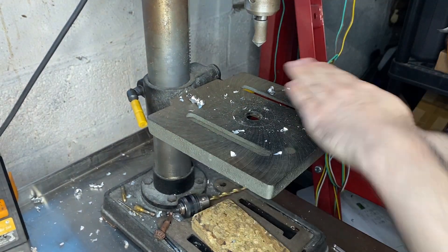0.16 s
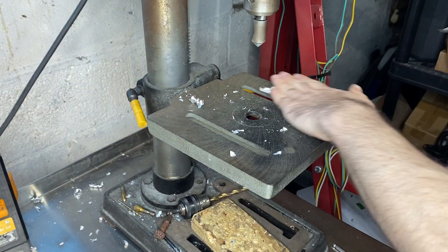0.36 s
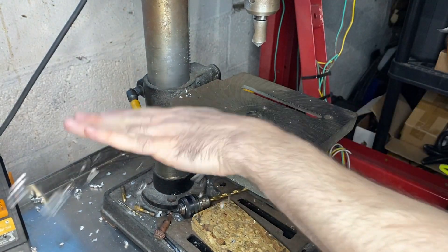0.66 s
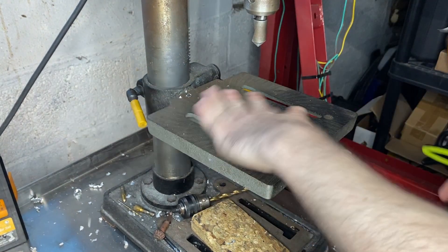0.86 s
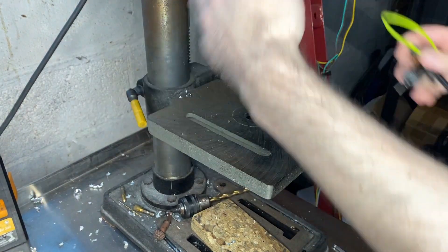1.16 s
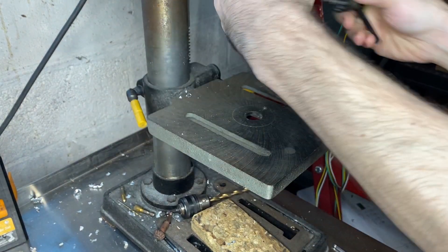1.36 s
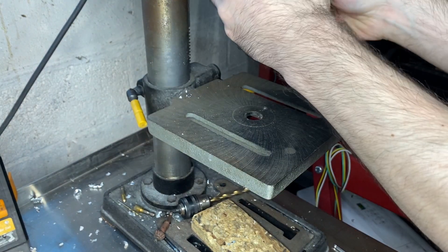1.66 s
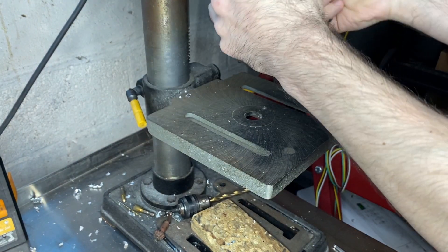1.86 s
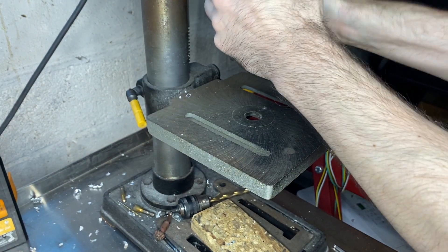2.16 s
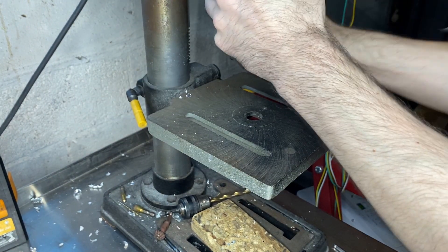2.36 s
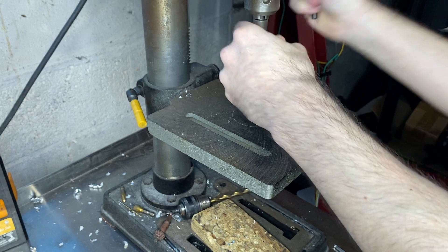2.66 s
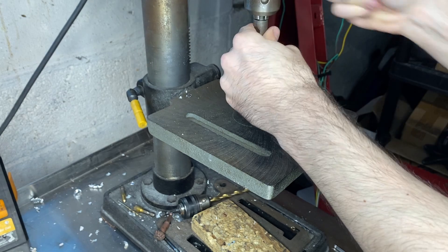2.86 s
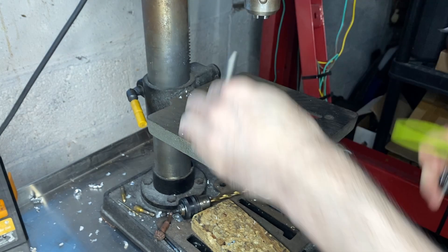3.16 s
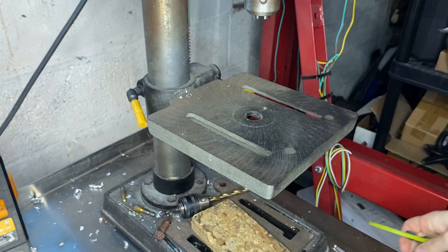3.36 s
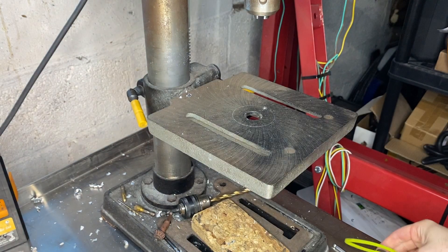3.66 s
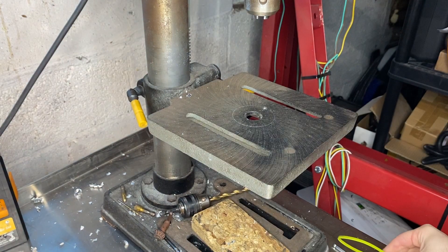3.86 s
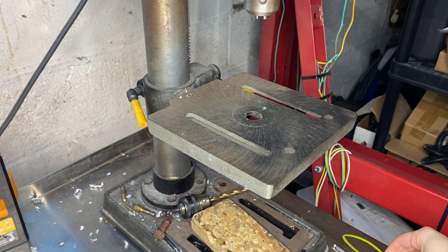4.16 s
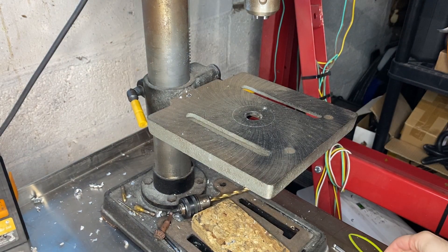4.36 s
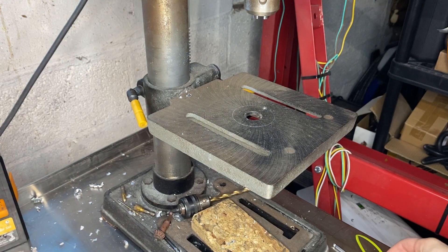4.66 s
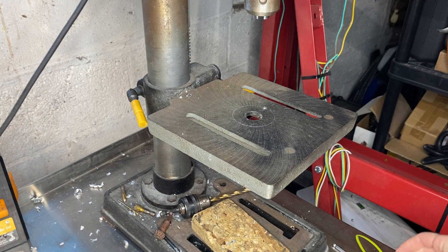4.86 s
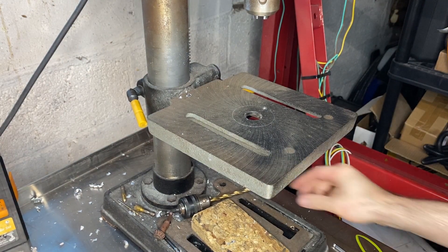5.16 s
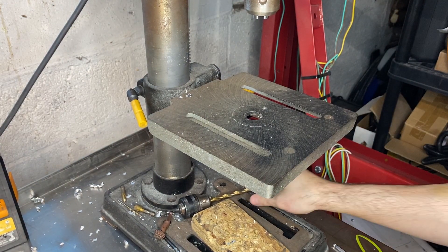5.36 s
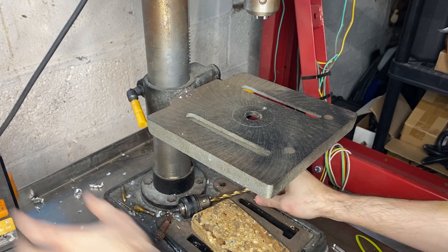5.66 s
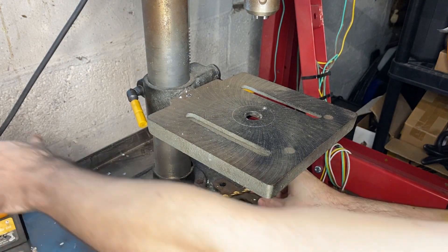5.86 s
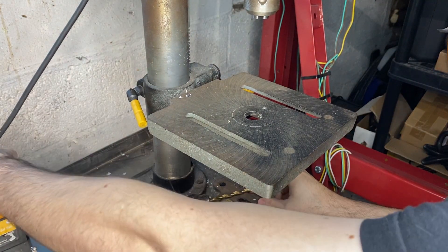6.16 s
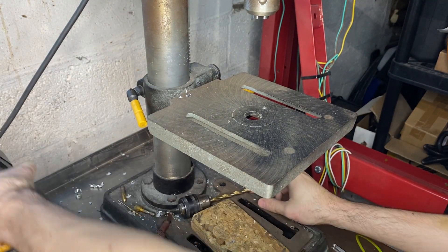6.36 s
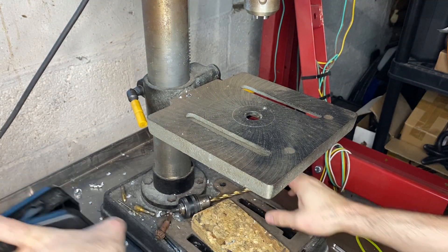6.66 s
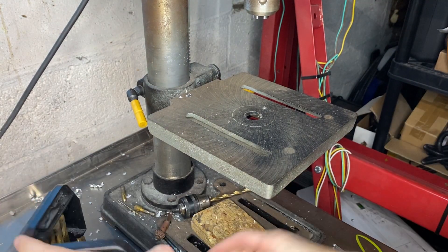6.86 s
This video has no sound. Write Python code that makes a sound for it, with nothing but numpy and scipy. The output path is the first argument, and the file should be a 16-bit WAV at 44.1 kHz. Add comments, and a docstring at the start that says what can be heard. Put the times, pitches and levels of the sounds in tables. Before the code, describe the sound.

A close stereo microphone in a small bare workshop, with a short hard room echo and very soft low background. From 0 to 1.2 seconds a hand sweeps metal chips off an iron table: light airy strokes, tiny bright ticks and tinkles, faint creaks and a soft thud near 0.9. Hard knocks of a key on a chuck come at about 1.3 and 1.7, then a dense, loudest cluster at 2.2 to 2.3 makes the cast machine head ring and boom. Small clicks follow, with a sharp bright clink near 2.9, then dry plinks and low bumps. Around 3.7 to 4.05 the bit and key clatter and bounce on the steel bench, and one rolls unevenly until about 4.7. It is almost silent until faint rubbing at 5.5. From 6.0 to 7.0 a box is dragged with scraping, abrupt cracks, jolts and dull thumps, strongest near 6.5.

```python
"""Drill press at close range

In a small bare workshop, two microphone ports sit close to a drill press. A hand sweeps chips off its iron
table, a key knocks the chuck open, the bit and key drop on the steel bench and a box is dragged over it.
Blows are noise cracks with clusters of dying modes, and friction is noise through a moving resonance.
Faint creaks, plinks and thuds, a soft low background and the room's answer lie behind.
"""
import sys
import numpy as np
from scipy import signal
from scipy.fft import rfft, irfft, next_fast_len
from scipy.io import wavfile
from scipy.ndimage import uniform_filter1d, map_coordinates

SR = 44100
rng = np.random.default_rng(int(sys.argv[2]) if len(sys.argv) > 2 else 0)


def generate_wav(signal):
    """Clip the signal to [-1, 1] and save it as 16-bit WAV at the path in sys.argv[1]."""
    frames = np.transpose(np.atleast_2d(signal))
    scaled = np.clip(frames, -1, 1) * 32767
    pcm = np.round(scaled).astype(np.int16)
    wavfile.write(sys.argv[1], SR, pcm)


N = 309141  # length in samples

# Pairs of channels are mid and side until scene() turns them into ports; table levels are source settings.
# key and jaws knocking the chuck: (t/s, sizzle peak level/dB, clank level/dB, body level/dB, t60/s,
# clink f/Hz, clink level/dB, boom level/dB, ring level/dB)
KNOCKS = [(1.333, -47.5, -56.5, -44.5, 0.26, 1593, -41, -40, -52),
          (1.6669, -35, -37.5, -39, 0.13, 3335, -33, -48.5, -42.5),
          (1.7261, -27, -51, -38, 0.096, 3420, -29.5, -36.5, -39),
          (1.7734, -46, -43.5, -37, 0.1, 1500, -43, -42, -41.5),
          (2.178, -49.5, -57.5, -51.5, 0.19, 1204, -48, -46.5, -55),
          (2.207, -40, -49, -38, 0.14, 2030, -38.5, -36.5, -41.5),
          (2.2263, -54.5, -56, -30.5, 0.12, 1430, -49, -34, -53.5),
          (2.291, -39.5, -42.5, -27.5, 0.18, 1800, -24.5, -27.5, -35.5),
          (2.2983, -26.5, -38.5, -23.5, 0.18, 1170, -25.5, -31, -27.5),
          (2.3146, -21.5, -28, -22, 0.16, 1507, -22.5, -28, -16.5),
          (2.8677, -35, -50, -47.5, 0.11, 1293, -40.5, -41.5, -44.5)]
# colour of the chuck: (f/Hz, level/dB per Hz)
CHUCK_COLOUR = [(150, -4.5), (500, 10), (1200, -5.5), (2500, -6), (5000, -19), (8000, -23), (12000, -27),
                (16500, -53.5)]


def chuck_knocks():
    """Hard blows whose treble dies much sooner than the body."""
    return clatter(KNOCKS, CHUCK_COLOUR, rise=0.00093, crack_db=1.5, treble_life=0.35, clink_life=0.62)


# lowest modes of the machine head: (f/Hz, level/dB, t60/s)
BOOM_MODES = [(215, 0, 0.5), (228, -8, 0.2), (205, -10, 0.2)]
# its higher modes: (f/Hz, level/dB, t60/s)
HEAD_MODES = [(291, -13, .12), (314, -11, .15), (371, -9, .35), (421, -9, .25), (453, -7, .25),
              (520, -3, .18), (577, -12, .15), (668, 1, .14), (700, 0, .18), (775, -15, .17),
              (862, -16, .2), (927, -16, .2), (1362, -22, .24), (4800, -35.5, 0.13)]


def machine_head():
    """Every knock sets the cast head ringing, its higher modes at new strengths; the boom builds up slowly."""
    out = np.zeros(N)
    for s, *_, boom_db, ring_db in KNOCKS:
        for hz, db, t60 in HEAD_MODES:
            strength = amp(ring_db + db + rng.normal(0, 2.3))
            add(out, s, strength * ring(hz, t60, rise=0.0075))
        for hz, db, t60 in BOOM_MODES:
            add(out, s + 0.0075, amp(boom_db + db) * ring(hz, t60, rise=.018))
    return out


# bit and key landing and bouncing on the bench: (t/s, sizzle peak level/dB, clank level/dB,
# body level/dB, t60/s, clink f/Hz, clink level/dB)
DROPS = [(3.6998, -21, -43, -33.5, 0.24, 725, -59), (3.7416, -18.5, -22.5, -24, 0.21, 1227, -31),
         (3.8797, -49, -40.5, -29, 0.17, 908, -32.5), (4.0013, -57, -52.5, -40, 0.35, 910, -42),
         (4.0239, -18, -27.5, -34.5, 0.21, 1770, -25.5), (4.0459, -17, -23.5, -21.5, 0.19, 1153, -18.5),
         (4.4177, -56, -69, -50.5, 0.96, 1160, -49.5), (4.6487, -47, -47.5, -47, 0.24, 1010, -40.5),
         (4.6997, -60, -47.5, -39, 0.18, 925, -48)]
# colour of the bench: (f/Hz, level/dB per Hz)
BENCH_COLOUR = [(150, -14.5), (300, -4), (500, -1.5), (1100, -3.5), (2000, -4), (3500, -7), (6000, -11),
                (11000, -6.5), (16500, -11)]


def bench_drops():
    """Landings on steel, with the quickest start of all the blows and a treble that dies little sooner."""
    return clatter(DROPS, BENCH_COLOUR, rise=.0003, crack_db=2, treble_life=.7, clink_life=.55)


# the box jolting as it is pulled: (t/s, sizzle peak level/dB, clank level/dB, body level/dB, t60/s,
# clink f/Hz, clink level/dB)
JOLTS = [(6.093, -56, -38.5, -20.5, 0.085, 705, -27), (6.216, -35, -41.5, -28.5, 0.068, 915, -37),
         (6.23, -62, -65, -31, 0.12, 860, -25), (6.334, -39, -56, -25, 0.2, 865, -43),
         (6.3684, -17, -52, -55, 0.086, 780, -19), (6.4294, -30, -33.5, -49, 0.19, 576, -35),
         (6.5481, -15, -41, -16.5, 0.078, 790, -32), (6.6386, -29, -37.5, -27.5, 0.12, 595, -37),
         (6.6994, -33, -39.5, -42.5, 0.13, 654, -34), (6.8783, -34, -28, -24.5, 0.025, 710, -32)]
# colour of the box: (f/Hz, level/dB per Hz)
BOX_COLOUR = [(150, -15.5), (400, -7), (800, 2), (1300, -12), (2200, -7.5), (3500, 3), (7000, -10),
              (16500, -7)]


def box_jolts():
    """Jolts with a soft start and a strong short crack over their ringing."""
    return clatter(JOLTS, BOX_COLOUR, rise=0.0057, crack_db=13, treble_life=0.4, clink_life=0.83)


# small contacts, mostly bright, a few dull, one from the box: (t/s, sizzle peak level/dB, clank level/dB,
# body level/dB, t60/s, clink f/Hz, clink level/dB)
SMALL_CONTACTS = [(0.4985, -30, -49, -79, 0.24, 7740, -45), (0.5577, -27.5, -69, -74, 0.11, 3810, -60),
                  (0.7092, -41, -82, -74, 0.055, 7430, -72), (0.762, -49.5, -80, -90, 0.36, 4300, -60),
                  (0.826, -31.5, -51, -70, 0.23, 7500, -56), (0.9012, -46, -51, -48, 0.3, 4020, -57),
                  (0.9482, -35, -51, -54, 0.1, 4200, -32), (1.138, -38, -63.5, -85, 0.25, 7800, -59),
                  (1.2072, -43, -73, -82, 0.067, 7500, -61), (1.4118, -47, -47.5, -51.5, 0.031, 2880, -57),
                  (1.6197, -50, -92, -59, 0.21, 6700, -79), (1.65, -29.5, -44.5, -46, 0.11, 3300, -65),
                  (2.0945, -68, -89, -50.5, 0.21, 2130, -68), (2.4766, -56, -69, -44.5, 0.046, 2440, -45),
                  (2.5005, -68, -56, -41, 0.059, 2520, -37), (2.5772, -50, -49, -58, 0.051, 2245, -49),
                  (2.6117, -68.5, -87, -35.5, 0.036, 1950, -70),
                  (2.7651, -33.5, -47.5, -44, 0.045, 3975, -44), (2.776, -37, -54, -42.5, 0.08, 6100, -40),
                  (2.7927, -37, -53, -59, 0.074, 6300, -53), (2.829, -36.5, -42, -40, 0.11, 5630, -25),
                  (2.861, -17.5, -32, -30.5, 0.033, 6400, -10.5),
                  (2.8838, -27, -51, -44.5, 0.073, 5100, -38), (2.9579, -65, -53, -45.5, 0.12, 3170, -35.5),
                  (3.028, -32, -57, -39, 0.049, 6420, -30.5), (3.1553, -50, -67, -51.5, 0.075, 6530, -53),
                  (3.2599, -82, -76, -47.5, 0.062, 2980, -48), (3.484, -36.5, -49, -78.5, 0.04, 5030, -52),
                  (4.3407, -43, -56, -43, 0.096, 2020, -55), (4.4607, -40.5, -53, -41, 0.13, 2520, -56),
                  (5.5844, -74, -81, -82, 0.052, 2860, -78.5), (5.6534, -71, -78, -52.5, 0.082, 2116, -74),
                  (6.0397, -53.5, -34.5, -53.5, 0.04, 3220, -25.5)]
# colour of the small contacts: (f/Hz, level/dB per Hz)
CONTACT_COLOUR = [(150, -0.5), (700, 8), (1500, -5), (4000, -4), (7000, -4.5), (11000, 2), (16500, 1.5)]


def small_contacts():
    """Small contacts, mostly bright and a few dull, whose clinks die quickly."""
    return clatter(SMALL_CONTACTS, CONTACT_COLOUR, rise=0.002, crack_db=4.0, treble_life=0.49, clink_life=0.27)


def clatter(rows, colour, rise, crack_db, treble_life, clink_life):
    """Each blow is a crack, a dense ringing that dies faster in the treble, and a cluster of modes that stands out."""
    shape, clinks, t = np.zeros((3, N)), np.zeros(N), np.arange(SR // 3) / SR
    start = 1 - np.exp(-t / rise / [[3], [1.4], [1]])  # low tones build up more slowly
    crest_db, cluster_db = 8.5, 15  # sizzle peak over its rms; a clink over each of its modes
    for s, sizzle_db, clank_db, body_db, t60, clink_hz, clink_db, *_ in rows:
        life = max(t60, .01) * np.array([[1], [np.sqrt(treble_life)], [treble_life]])
        ringing = amp(-60 * t / life)
        crack = amp(crack_db - 60 * t / 0.0042)
        level = amp([[body_db], [clank_db], [sizzle_db - crest_db]])
        add(shape, s, level * (ringing + crack) * start)
        for detune, size, last in rng.standard_normal(size=(14, 3)):
            mode = ring(clink_hz * amp(.9 * detune), t60 * clink_life * amp(1.2 * last), rise)
            add(clinks, s, amp(clink_db - cluster_db + 1.5 * size) * mode)
    noise = bands(colour, rng.standard_normal((2, N)))
    return (shape * noise).sum(axis=1) + clinks * [[1.3], [.6]]


# strokes over metal, and noisy swells left ringing after some blows: (t/s, rise/s, hold/s, t60/s,
# body level/dB, scrape level/dB, sizzle level/dB, resonance f/Hz)
SWELLS = [(0.0, 0.0033, 0.055, 0.17, -59.5, -66, -75.5, 2100),
          (0.348, 0.036, 0.0037, 0.32, -52.5, -58.5, -49.5, 2193),
          (0.433, 0.046, 0.11, 0.25, -81, -58.5, -48.5, 3500),
          (0.798, 0.044, 0.053, 0.2, -54.5, -72, -55, 3322),
          (0.902, 0.017, 0.021, 0.64, -59.5, -75.5, -53, 3920),
          (1.15, 0.067, 0.071, 0.43, -80.5, -84.5, -67.5, 3585),
          (1.723, 0.017, 0.023, 0.4, -49, -76, -85, 2113),
          (1.928, 0.055, 0.11, 0.36, -71.5, -81, -66.5, 2464),
          (2.13, 0.045, 0.018, 0.13, -59.5, -74, -68, 2061),
          (2.421, 0.0071, 0.087, 0.17, -51, -63.5, -84.5, 2055),
          (2.534, 0.033, 0.011, 0.061, -60, -71.5, -54, 2110),
          (2.67, 0.019, 0.0044, .1, -74.5, -79, -69, 2800), (2.883, .01, 0.039, 0.1, -53, -57, -74.5, 2422),
          (2.932, 0.032, 0.019, 0.19, -46.5, -51, -79, 3142),
          (3.264, 0.012, 0.036, 0.21, -61.5, -87.5, -83.5, 2676),
          (3.474, .02, 0.016, 0.18, -71, -80.5, -72, 3200),
          (3.584, 0.058, 0.082, 0.26, -79.5, -79.5, -71, 3360),
          (3.772, 0.018, 0.11, 0.29, -44, -47, -61.5, 3018), (5.47, 0.031, .03, .3, -76, -89, -93, 2300),
          (5.611, 0.042, 0.018, 0.37, -85, -71, -78.5, 2748),
          (5.716, .15, 0.074, 0.33, -84.5, -76.5, -75.5, 3353),
          (6.025, 0.011, 0.033, 0.19, -51.5, -56.5, -82, 3250),
          (6.079, 0.017, 0.014, 0.25, -38.5, -53.5, -70, 2400),
          (6.204, 0.019, 0.011, 0.11, -44, -53, -78, 1973)]
# the long pull of the box: (t/s, scrape level/dB, body over it/dB, sizzle over it/dB, resonance f/Hz)
DRAG = [(6.27, -58.5, 2, -12, 2250), (6.358, -49, 6.5, 7.5, 2730), (6.406, -47, 0.5, 8, 3470),
        (6.446, -40, -0.5, -1.5, 3480), (6.532, -47, 7.5, 9.5, 2500), (6.588, -52, 10, 5.5, 2430),
        (6.816, -47.5, -3, -1.5, 3190), (6.928, -50, 7, 2.5, 2250), (6.958, -46.5, -9, -6, 3170),
        (7.01, -52, 4, 2, 3430)]
# friction of the rolling bit; body, scrape, sizzle rows: (level at the start/dB, dB lost per dB of roll level)
ROLL_HISS = [(-58.5, 7.5), (-46.5, 4), (-51.5, 2.6)]
# colour of the friction: (f/Hz, level/dB per Hz)
SLIDE_COLOUR = [(150, 0.5), (500, 7), (1000, 1), (2000, -6.5), (4000, -10), (7500, -11), (11000, -11),
                (16500, -9.5)]


def strokes_and_swells():
    """Noise through one moving resonance, the level-weighted mean of all that rubs, with a fast random flutter."""
    roll_hz = 2600
    level = np.full((3, N), 1e-7)
    pull = np.full(N, 1e-7 * roll_hz)  # resonance weighted by level
    for s, rise, hold, t60, *dbs, hz in SWELLS:
        t = np.arange(round((rise + hold + t60) * SR)) / SR
        swell = np.clip(t / rise, 0, 1) ** 2
        fade = amp(-60 * np.clip(t - rise - hold, 0, None) / t60)
        shape = amp(dbs)[:, None] * swell * fade
        add(level, s, shape)
        add(pull, s, hz * shape.sum(axis=0))

    drag_db, body_db, sizzle_db, drag_hz = during(DRAG)
    drag = amp([drag_db + body_db, drag_db, drag_db + sizzle_db])
    roll_db, = during(ROLLING)
    roll = amp([db + slope * (roll_db - ROLLING[0][1]) for db, slope in ROLL_HISS])
    pull = pull + drag_hz * drag.sum(axis=0) + roll_hz * roll.sum(axis=0)
    level = level + drag + roll
    resonance_hz = pull / level.sum(axis=0)

    flutter = amp(1.46 * map_coordinates(rng.standard_normal(N // 100), [np.arange(N) / SR * 250]))
    peak_hz = lambda at: np.interp(at * SR, np.arange(N), resonance_hz)
    noise = patchy(depth_db=1.5, peak_hz=peak_hz, peak_db=7, width=0.3)
    return (level * flutter * bands(SLIDE_COLOUR, noise)).sum(axis=1)


# the bit rolling along the bench: (t/s, level/dB)
ROLLING = [(4.1, -42), (4.25, -46.5), (4.41, -54), (4.448, -58.5), (4.46, -48.5), (4.642, -56)]
# modes of the steel under it: (f/Hz, width/Hz, level/dB)
ROLL_MODES = [(604, 230, -4.5), (970, 670, -1.5), (1350, 120, 1.5), (1900, 420, -12)]


def rolling():
    """Uneven random bumps keep the steel's modes sounding."""
    level = amp(during(ROLLING)[0])
    unevenness = uniform_filter1d(rng.standard_normal(N), size=100) * 10
    bumps = rng.standard_normal((2, N)) * amp(2.5 * unevenness)

    def steel(f):
        """Band-pass modes summed with alternating sign."""
        return sum((-1) ** k * amp(db) * 1j * f * width / (hz * hz - f * f + 1j * f * width)
                   for k, (hz, width, db) in enumerate(ROLL_MODES))
    x = filtered(bumps, steel)
    return level * x / x.std()


# soft low bumps: (t/s, level/dB, f/Hz, t60/s)
THUDS = [(.895, -34, 207, 0.12), (.9, -38.5, 164, 0.3), (1.281, -54.5, 298, 0.6), (2.299, -43, 40.6, .5),
         (3.44, -45.5, 39.7, 1), (3.46, -51.5, 184.5, 0.15), (3.502, -39.5, 72.3, 0.44),
         (3.549, -55, 56.7, 0.4), (5.119, -56, 60.2, .4), (6.298, -45, 96, 0.3), (6.52, -34.5, 230, 0.24),
         (6.539, -37, 285, 0.25), (6.577, -32, 95.3, 0.44), (6.59, -39.5, 152, 0.21)]


def thuds():
    """Single low modes with a soft start."""
    out = np.zeros(N)
    for s, db, hz, t60 in THUDS:
        add(out, s, amp(db) * ring(hz, t60, rise=0.011))
    return out


# short creaks: (t/s, low level/dB, middle level/dB, high level/dB)
CREAKS = [(0.105, -51, -54, -69), (0.219, -49.5, -51, -57.5), (0.242, -51, -76, -82),
          (0.386, -63, -70, -56), (0.459, -58, -59, -76), (0.6, -64, -54.5, -74), (0.85, -48, -52, -50.5),
          (1.021, -57, -51, -76), (1.123, -59, -59.5, -86), (1.584, -58, -73, -85), (1.96, -55, -53.5, -72),
          (2.159, -48.5, -57, -62.5), (3.164, -61, -54.5, -72), (3.34, -47.5, -51.5, -59.5),
          (5.499, -92, -69.5, -82), (5.655, -71, -79, -79)]
# their three overtones before a small random detuning: f/Hz
CREAK_HZ = [654, 942, 1257]
# span of the weaker creaks at random moments: (from t/s, to t/s, mean low level/dB)
FAINT_CREAKS = (0, 3.7, -69)


def creaks():
    """Uneven stick and slip on three overtones, swelling for 9 ms and then fading."""
    out, t = np.zeros(N), np.arange(round(.07 * SR)) / SR
    first, last, faint_db = FAINT_CREAKS
    luck = rng.random(size=(70, 4))
    moments = first + (last - first) * luck[:, 0]
    faint = np.c_[moments, faint_db + 14 * (luck[:, 1:] - .5) - [0, 1.5, 12]]
    swell = (t / .009) ** 1.4 * np.exp(1.4 * (1 - t / .009))
    for s, *dbs in [*CREAKS, *faint]:
        tuned_hz = CREAK_HZ * (1 + rng.normal(0, .02, size=3))
        tones = np.zeros(len(t))
        for db, hz in zip(dbs, tuned_hz):
            rough = 1 + .35 * map_coordinates(rng.standard_normal(size=40), [t * 180])
            tones += amp(db) * rough * np.sin(2 * np.pi * hz * t)
        add(out, max(s - .007, 0), swell * tones)
    return out


# dry plinks near 800 Hz: (t/s, level/dB of each mode)
PLINKS = [(0.704, -48), (1.192, -56), (1.418, -47), (1.993, -44), (2.764, -36.5), (3.133, -38.5),
          (3.261, -43), (3.384, -42), (3.521, -42.5), (3.631, -48), (4.872, -50.5), (5.131, -52.5),
          (5.397, -58.5)]


def plinks():
    """Three very short modes, a little different in pitch and length each time."""
    out = np.zeros(N)
    for s, db in PLINKS:
        modes = [(700, .02), (800, .026), (900, .022)] * rng.normal(1, .03, size=(3, 2))  # (f/Hz, t60/s)
        for hz, t60 in modes:
            add(out, s, amp(db) * ring(hz, t60, rise=0.003))
    return out


# low background, soft rumble and murmur, stronger after some blows: (t/s, rumble level/dB, murmur level/dB)
BACKGROUND = [(0.0, -64, -57.5), (0.41, -62.5, -66), (0.68, -72.5, -67), (0.9, -58, -71.5),
              (1.3, -65.5, -68.5), (1.54, -67, -75), (1.8, -58.5, -58), (2.1, -72, -65.5),
              (2.36, -42.5, -53.5), (2.6, -60, -58.5), (3.1, -62, -68.5), (3.4, -63.5, -66),
              (3.701, -61, -71), (4.14, -57.5, -63), (4.4, -70, -60.5), (4.86, -69, -80.5),
              (5.45, -70.5, -78.5), (5.6, -63, -70.5), (5.95, -66, -83), (6.2, -53, -63), (6.54, -50, -48),
              (7.01, -61, -57)]
# faint hiss in the clank and sizzle bands: level/dB
HUSH_DB = [-90.5, -91]
# colour of the background: (f/Hz, level/dB per Hz)
BACKGROUND_COLOUR = [(30, -11.5), (55, 6), (110, -2.5), (200, -7.5), (400, -3.5), (700, -4.5),
                     (1100, -17.5), (1600, -28.5), (4000, -21), (8000, -25), (12000, -22), (15000, -29),
                     (16500, -38)]


def background():
    """Soft low patchy noise whose levels drift, over a hiss set at constant level."""
    s, *columns = np.transpose(BACKGROUND)
    level_db = [np.interp(np.arange(N) / SR, s, c) for c in columns] + [np.full(N, db) for db in HUSH_DB]
    return (amp(level_db) * bands(BACKGROUND_COLOUR, patchy(depth_db=4.0), first=0)).sum(axis=1)


# decay of the small bare room: (f/Hz, t60/s)
ROOM_T60 = [(200, 0.68), (1000, 0.43), (4000, 0.4), (12000, 0.33)]


def room(x):
    """Each frequency of the walls' answer dies at its own speed."""
    hz, t, z = signal.stft(rng.standard_normal((2, SR * 3 // 4)), SR, nperseg=256)
    tail = signal.istft(z * amp(-60 * t / along(ROOM_T60, hz)[:, None]), SR, nperseg=256)[1]
    late = np.pad(x, ((0, 0), (300, 0)))  # the answer starts 300 samples late
    return signal.fftconvolve(late, tail / np.linalg.norm(tail[0]), axes=1)[:, :N]


def amp(db):
    """Gain of a level in dB."""
    return np.exp(np.asarray(db) * np.log(10) / 20)


def along(points, hz):
    """Value at hz of (f/Hz, value) points on a log axis."""
    f, v = np.transpose(points)
    return np.interp(np.log(hz + 1), np.log(f + 1), v)


def filtered(x, response):
    """Sound x times a complex response of frequency."""
    m = next_fast_len(x.shape[-1] + 8192)
    return irfft(rfft(x, m) * response(np.fft.rfftfreq(m, 1 / SR)), m)[..., :x.shape[-1]]


def above(hz, edge_hz):
    """Power share over a soft crossover."""
    return 1 / (1 + (edge_hz / (hz + 1)) ** 6)


# crossovers between rumble, body, clank (or scrape) and sizzle: f/Hz
SPLIT_HZ = [160, 1500, 6000]


def bands(colour, noise, first=1):
    """Two-channel noise of one colour cut into rumble, body, clank and sizzle from band first, each of rms 1."""
    def response(f):
        a, b, c = (above(f, edge) for edge in SPLIT_HZ)
        return amp(along(colour, f)) * np.sqrt([1 - a, a - b, b - c, c])[first:]
    x = filtered(noise[:, None], response)
    return x / x.std(axis=(0, 2), keepdims=True)


def patchy(depth_db, peak_hz=None, peak_db=0, width=.2):
    """Two-channel noise with patches of random gain and, if asked, a resonance that moves."""
    hz, t, z = signal.stft(rng.standard_normal((2, N)), SR, nperseg=256)
    field = uniform_filter1d(rng.standard_normal(z.shape[1:]), size=5, axis=0)
    field = uniform_filter1d(field, size=7, axis=1)
    gain_db = depth_db * field / field.std()
    if peak_hz:
        gain_db += peak_db * np.exp(-(np.log((hz[:, None] + 1) / peak_hz(t)) / width) ** 2)
    return signal.istft(z * amp(gain_db), SR, nperseg=256)[1][:, :N]


def ring(hz, t60, rise):
    """One dying mode with a soft start, cut when it has faded."""
    t = np.arange(round(t60 * SR)) / SR
    return amp(-60 * t / t60) * (1 - np.exp(-t / rise)) * np.sin(2 * np.pi * hz * t)


def during(rows, fade_s=0.068):
    """One value per sample for each column; the first is a level that falls to -90 dB outside the rows."""
    s, db, *columns = np.transpose(rows)
    t = np.arange(N) / SR
    level_db = np.interp(t, np.r_[s[0] - fade_s, s, s[-1] + fade_s], np.r_[-90, db, -90])
    return [level_db] + [np.interp(t, s, c) for c in columns]


def add(track, s, sound):
    """Mixes a sound in from time s."""
    part = track[..., round(s * SR):]
    n = min(part.shape[-1], sound.shape[-1])
    part[..., :n] += sound[..., :n]


# likeness of the two ports: (f/Hz, likeness from 0 to 1)
ALIKE = [(60, 1), (130, 0.49), (220, 1), (400, 0.13), (800, 0.2), (1500, 0.097), (4500, 0.35)]


def scene():
    """All sources, the room's answer and the two microphone ports."""
    blows = small_contacts() + chuck_knocks() + bench_drops() + box_jolts()
    placed = np.array([[1.4], [.4]])  # mid and side shares
    head = placed * machine_head()
    small = placed * (thuds() + creaks() + plinks())
    near = blows + head + strokes_and_swells() + rolling()
    answer = amp(-10.5) * room(near + amp(-2.5) * small)  # the small sounds stay drier
    mid, side = near + small + answer + background()

    # the likeness of the close ports sets how far mid outweighs side
    turn = lambda hz: np.arccos(np.clip(along(ALIKE, hz), -1, 1)) / 2
    mid, side = filtered(np.array([mid, side]), lambda hz: [np.cos(turn(hz)), np.sin(turn(hz))])
    return np.array([mid + side, mid - side]) * amp([[.8], [-.8]])


def record(dry):
    """Treble comes mostly from the left port and reaches the right channel shifted; then the band limit."""
    shared_hz, lead_s, turn_rad, top_hz = 7300, .0002326, 9.8, 15950
    share = lambda hz: .95 / (1 + (shared_hz / (hz + 1)) ** 16)
    shift = lambda hz: np.exp(1j * (2 * np.pi * hz * lead_s - turn_rad))
    shifted = filtered(dry[0], lambda hz: share(hz) * shift(hz))
    right = filtered(dry[1], lambda hz: np.sqrt(1 - share(hz) ** 2)) + shifted
    return filtered(np.array([dry[0], right]), lambda hz: 1 / (1 + (hz / top_hz) ** 120))


dry = scene()
out = record(dry)
generate_wav(out)
```